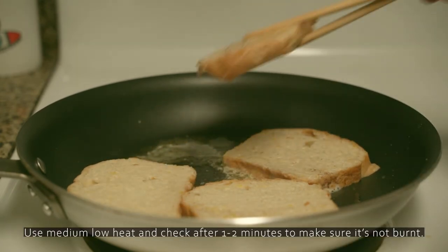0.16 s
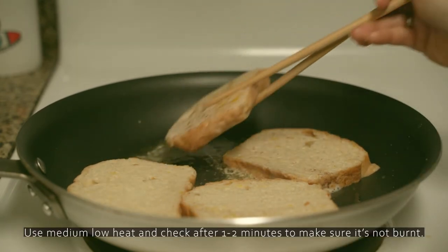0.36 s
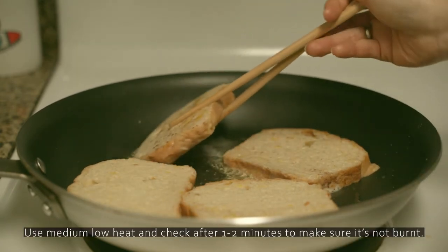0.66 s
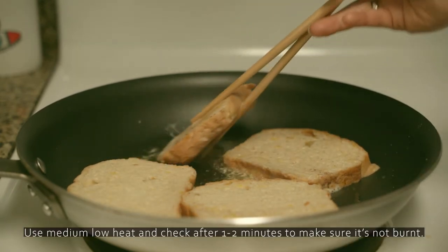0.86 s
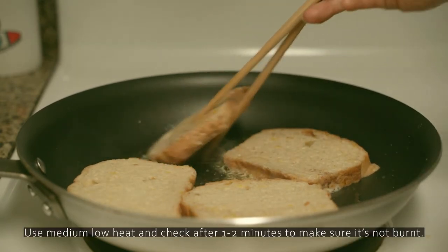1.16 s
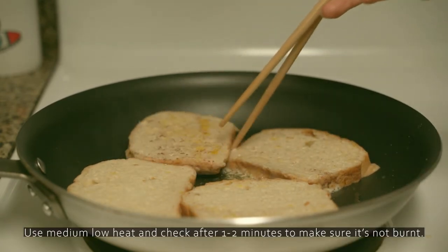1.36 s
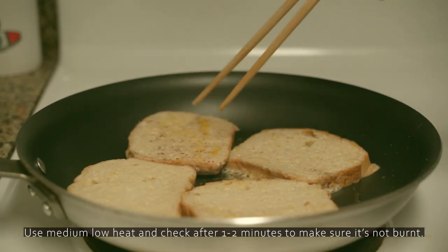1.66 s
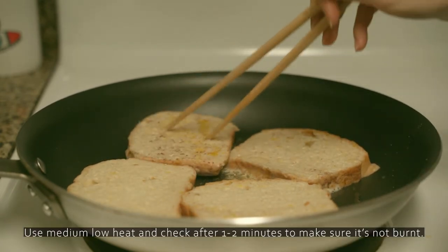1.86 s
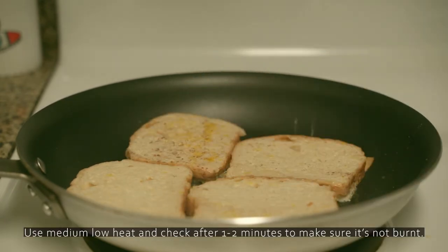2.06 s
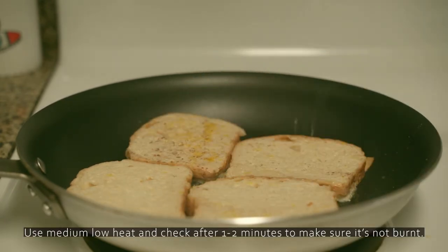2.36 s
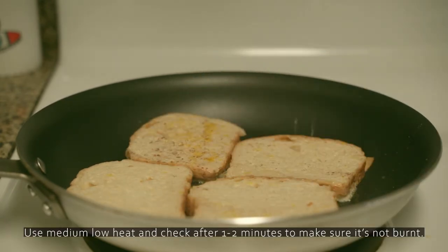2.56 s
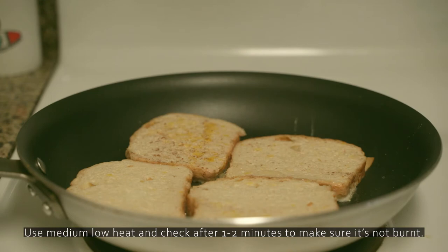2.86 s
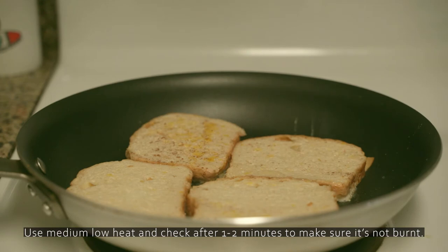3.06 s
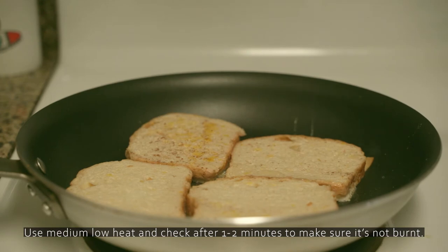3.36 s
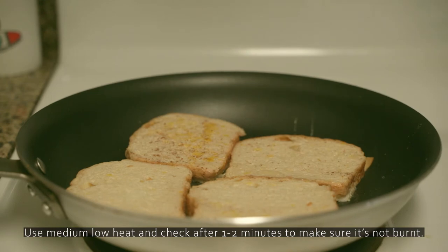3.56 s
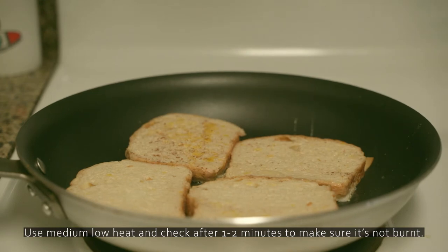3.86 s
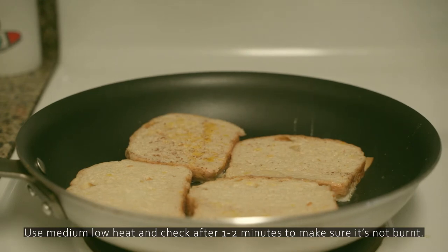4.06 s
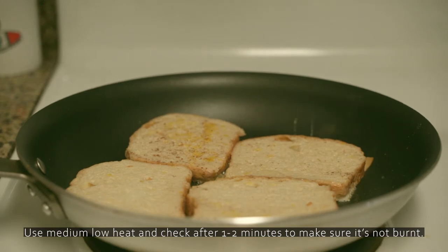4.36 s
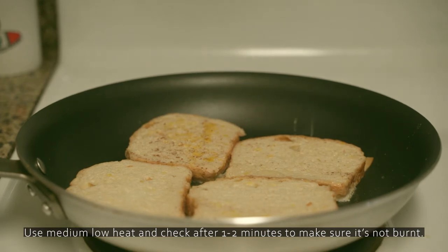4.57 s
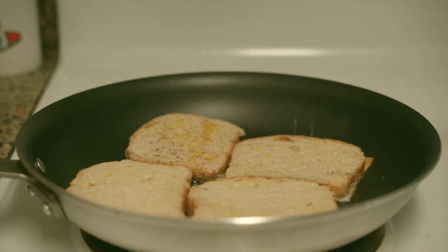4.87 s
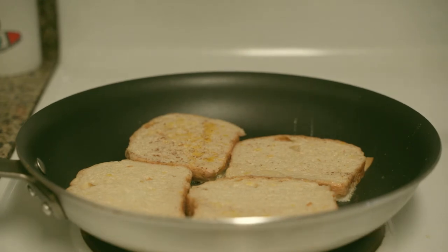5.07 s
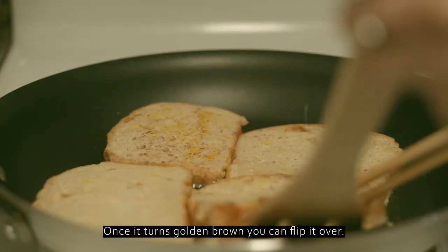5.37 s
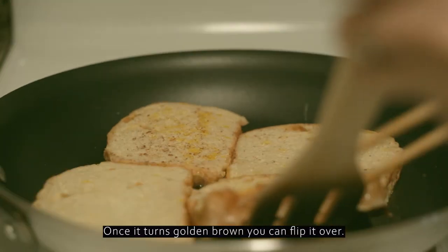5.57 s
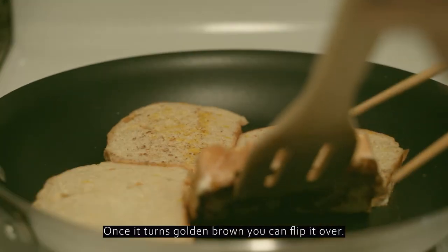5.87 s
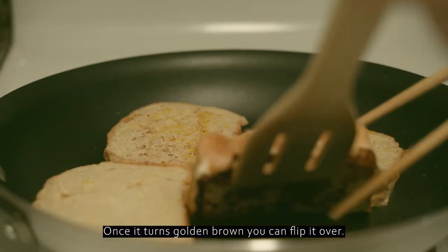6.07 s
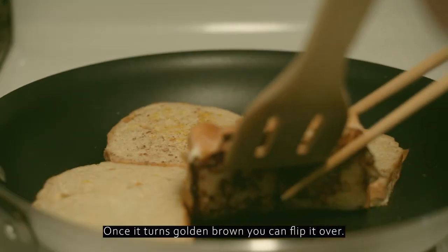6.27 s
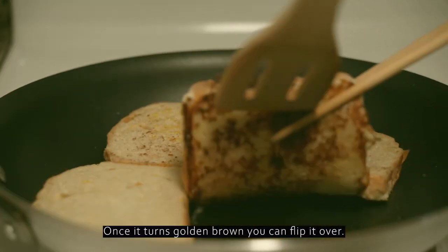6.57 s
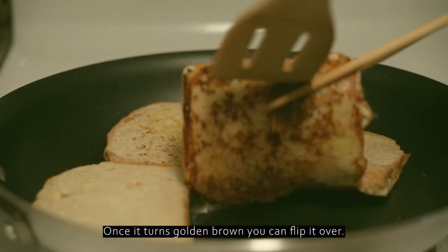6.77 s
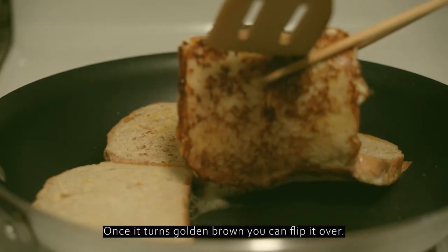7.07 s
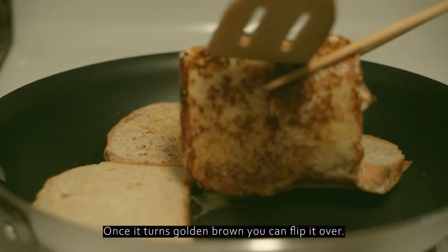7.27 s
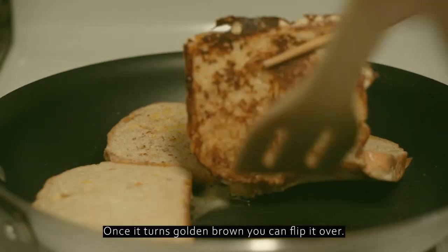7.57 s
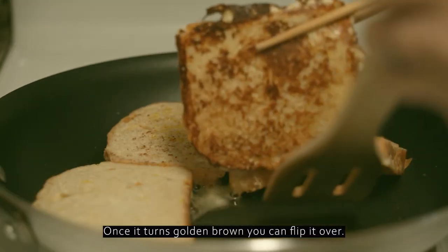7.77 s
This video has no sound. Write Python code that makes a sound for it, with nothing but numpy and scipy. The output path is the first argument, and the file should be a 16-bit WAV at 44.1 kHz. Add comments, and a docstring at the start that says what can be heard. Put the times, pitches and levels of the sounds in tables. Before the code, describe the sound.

A frying pan crackles nearby, loudest at first, with hard snaps and a few squeaky metallic rubs as a slice is moved. The fizz thins slightly, still popping, and something knocks once. Then a sudden cut to much quieter frying: thin fizz, occasional ticks and grainy wooden scraping. A fan hums and rumbles steadily behind in a small, hard-surfaced kitchen.

```python
"""Kitchen: egg-soaked bread fries in butter in a steel pan, with a fan rumbling and humming behind.
Fizz: random bubble bursts, each ringing a few cycles; pops and snaps: clicks with close, hard echoes.
Chopsticks drag a slice so that the pan's modes ring; a few damped modes make one knock.
The fizz is louder before 5.15 s, much quieter after, where a wooden turner scrapes softly (band noise).
Fan: noise bands plus narrow tones; a deep motor throb and faint swelling tones are wavering sines."""
import sys
import numpy as np
from scipy import signal
from scipy.io import wavfile

SR = 44100
rng = np.random.default_rng(int(sys.argv[2]) if len(sys.argv) > 2 else 0)


def generate_wav(sig):
    """Save sig (samples, or channels by samples) to the path in sys.argv[1] as 16-bit PCM at SR."""
    pcm = np.round(np.clip(np.atleast_2d(sig).T, -1, 1) * 32767).astype(np.int16)
    wavfile.write(sys.argv[1], SR, pcm)


N = 349272


def from_db(db):
    """Decibels to amplitude gain."""
    return 10 ** (np.asarray(db) / 20)


def rms_one(x):
    """Scaled to rms 1."""
    return x / np.sqrt(np.mean(x ** 2) + 1e-20)


def in_time(rows):
    """Each column after t/s as a curve, one value a sample."""
    t_s, *columns = np.transpose(rows)
    return [np.interp(np.arange(N) / SR, t_s, column) for column in columns]


def at_hz(points, hz):
    """A spectrum read on a log-frequency axis."""
    table_hz, values = np.array(points)[:, :2].T
    return np.interp(np.log(hz), np.log(table_hz), values)


def drift(rate_hz):
    """Slow random curve of rms 1: noise through two one-pole low-passes at rate_hz."""
    step = 40  # samples between computed points
    pole = np.exp(-2 * np.pi * rate_hz * step / SR)
    noise = rng.standard_normal(N // step + 2002)
    slow = signal.lfilter([1], [1, -2 * pole, pole ** 2], noise)[2000:]  # settled part
    return np.interp(np.arange(N) / step, np.arange(len(slow)), rms_one(slow))


def band(x, low_hz, high_hz):
    """Butterworth band-pass; the upper edge stays below Nyquist."""
    edges_hz = [low_hz, min(high_hz, SR / 2.1)]
    return signal.sosfilt(signal.butter(2, edges_hz, "band", fs=SR, output="sos"), x)


def ring(x, hz, t60_s):
    """Two-pole resonance: a unit click starts a decaying sine of height 1."""
    radius = from_db(-60 / (t60_s * SR))
    angle = 2 * np.pi * hz / SR
    return signal.lfilter([0, np.sin(angle)], [1, -2 * radius * np.cos(angle), radius ** 2], x + 1e-18)


def narrow_noise(hz, width_hz):
    """Noise through one resonance; rms 1."""
    t60_s = np.log(1000) / (np.pi * width_hz)
    return rms_one(ring(rng.standard_normal(N), hz, t60_s))


def wavering(hz, waver_hz, rate_hz):
    """Sine with drifting pitch and strength; rms 1."""
    turns = np.cumsum(hz + waver_hz * drift(rate_hz)) / SR + rng.random()
    return rms_one(np.sin(2 * np.pi * turns) * from_db(1.8 * drift(rate_hz)))


def swell(middle_s, length_s):
    """One half-cosine rise and fall of height 1."""
    return np.cos(np.pi * np.clip((np.arange(N) / SR - middle_s) / length_s, -.5, .5))


def clicks(times_s, gains):
    """Unit-sample train."""
    out = np.zeros(N)
    np.add.at(out, np.minimum((np.asarray(times_s) * SR).astype(int), N - 1), gains)
    return out


# left-right correlation of diffuse sound: f/Hz, correlation
LIKENESS = [(60, 1), (150, 0.88), (380, 0.66), (950, 0.62), (2380, 0.83), (5980, 0.3), (15000, 0.18)]


def stereo(mid, side, hz):
    """Two noises mixed to the left-right correlation of diffuse sound at hz."""
    alike = np.clip(at_hz(LIKENESS, hz), 0, 1)
    return np.sqrt(1 + alike) * mid + np.sqrt(1 - alike) * side * [[1], [-1]]


def diffuse(hz):
    """White stereo noise of rms 1 with the diffuse correlation of hz."""
    mid, side = rng.standard_normal((2, N))
    return stereo(mid, side, hz) / np.sqrt(2)


def tail(power, t60_s):
    """Amplitude envelope of sound that lingers after bursts of power."""
    fall = from_db(-120 / (t60_s * SR))
    return np.sqrt(signal.lfilter([0, 1 - fall], [1, -fall], power + 1e-18))


# pan wall, hob, splashback: delay/s, left level/dB, right level/dB
ECHOES = [(.0026, -9, -38), (.0059, -11.5, -19), (.0118, -4, -11)]


def echoes(x):
    """Direct sound plus hard reflections, a few samples later left than right."""
    out = np.array([x, x])
    for k, (delay_s, left_db, right_db) in enumerate(ECHOES):
        lag, skew = round(delay_s * SR), k + 1
        out[0, lag + skew:] += from_db(left_db) * x[:-lag - skew]
        out[1, lag - skew:] += from_db(right_db) * x[:-lag + skew]
    return out


# fan noise, relative spectrum: f/Hz, density/dB per Hz
FAN_SPECTRUM = [(11, -31), (18, 12), (43, -2.5), (97, 1.5), (167, -2.5), (492, -8.5), (794, -3),
                (881, -0.5), (1480, -7), (1900, -7), (2110, -18), (2600, -30), (3380, -48), (5720, -120)]
# steady fan tones: f/Hz, width/Hz, level/dB
FAN_TONES = [(173.5, 16.4, -63.5), (350, 14, -72)]
FAN_NOISE_DB = -51


def fan(patchy_db):
    """Rushing air as half-octave noise bands with drifting levels, plus the motor's tones."""
    air, edges_hz = 0, 18 * 2 ** np.arange(0, 8, .5)
    white = rng.standard_normal((2, 2, N))  # neighbouring bands take different noise
    for k, (low_hz, high_hz) in enumerate(zip(edges_hz, edges_hz[1:])):
        mid, side = band(white[k % 2], low_hz, high_hz)
        hz = np.sqrt(low_hz * high_hz)
        gain = from_db(at_hz(FAN_SPECTRUM, hz) + patchy_db * drift(9.3))
        air = air + gain * stereo(mid, side, hz)
    tones = sum(from_db(db) * narrow_noise(hz, width_hz) for hz, width_hz, db in FAN_TONES)
    return from_db(FAN_NOISE_DB) * rms_one(air) + tones


# motor throb: t/s, level/dB
THROB = [(0.0, -56), (1.15, -60.5), (2.87, -64), (4.98, -60), (5.82, -71), (6.53, -58), (6.86, -75),
         (7.41, -58), (7.92, -67)]


def throb(hz, waver_hz):
    """Deep motor throb: one wavering sine under a level curve."""
    level_db, = in_time(THROB)
    return from_db(level_db) * wavering(hz, waver_hz, 3.5)


# faint tones: middle t/s, length/s, level/dB, f/Hz
FAINT_TONES = [(2.5, 1.5, -65.5, 370), (6.05, 0.37, -68, 300), (6.18, .3, -61.5, 236),
               (7.206, 1.2, -62, 230), (7.75, 0.99, -58, 304)]


def faint_tones(waver_hz):
    """Wavering low sines that swell and fade."""
    return sum(from_db(db) * swell(middle_s, length_s) * wavering(hz, waver_hz, 3.0)
               for middle_s, length_s, db, hz in FAINT_TONES)


# wooden turner sliding under the bread: t/s, level/dB
TURNER = [(5.42, -74), (5.6, -50.5), (5.9, -54.5), (6.1, -55.5), (6.37, -53), (6.9, -57), (7.4, -59)]


def turner():
    """Soft, grainy scrape of wood: band noise with a fast-drifting level."""
    level_db, = in_time([(0, -99)] + TURNER + [(8, -99)])
    rub = diffuse(930) * from_db(3.9 * drift(25.0))
    return from_db(level_db) * rms_one(band(rub, 980, 2000))


# dull blow: t/s, level/dB
KNOCK = [(3.819, -23.5)]
# modes it excites: f/Hz, level/dB, t60/s
KNOCK_MODES = [(259, -19, 0.027), (613, -0.5, 0.013), (930, 1.5, 0.0037), (1430, -1, 0.0042),
               (2240, -1, 0.0093)]


def knocks(room_db, room_t60_s):
    """A blow, its echoes and room tail drive a few well-damped modes."""
    times_s, levels_db = np.transpose(KNOCK)
    blows = clicks(times_s, from_db(levels_db))
    room = from_db(room_db) * tail(blows ** 2, room_t60_s) * diffuse(500)
    heard = echoes(blows) + room
    modes = sum(from_db(db) * ring(heard, hz, t60_s) for hz, db, t60_s in KNOCK_MODES)
    return band(modes, 180, 3000)


# slips of the dragged slice: middle t/s, length/s, level/dB
DRAG_SLIPS = [(.572, 0.062, -37), (0.641, 0.07, -33), (0.688, .05, -38), (0.73, 0.057, -32.5),
              (0.863, 0.053, -37.5), (1.23, 0.18, -43), (1.308, 0.11, -39), (1.396, 0.11, -39.5),
              (1.475, .05, -37.5), (1.516, 0.052, -35), (1.587, 0.17, -39.5)]
# low pan modes under the slice: f/Hz, waver/Hz, level/dB
PAN_LOW_MODES = [(594, 22, -16), (678, 22, -17), (1010, 25, -14), (1654, 9, 0)]


def drag():
    """Each slip of the sliding slice sets the pan's low modes singing."""
    slips = sum(from_db(db) * swell(middle_s, length_s) for middle_s, length_s, db in DRAG_SLIPS)
    return slips * sum(from_db(db) * wavering(hz, waver_hz, 32.3) for hz, waver_hz, db in PAN_LOW_MODES)


# butter gurgling under the slices: t/s, level/dB
GURGLE = [(0, -55.5), (.55, -48), (1.9, -48), (2.1, -57), (3.0, -59.5), (3.4, -54), (7.92, -75)]


def gurgle(low_hz, high_hz):
    """Fat bubbling under the bread: low band noise with a lumpy level."""
    level_db, = in_time(GURGLE)
    lumps = diffuse(700) * from_db(2.0 * drift(33.0))
    return from_db(level_db) * rms_one(band(lumps, low_hz, high_hz))


# high pan modes rung by the bursts: f/Hz, width/Hz, level/dB
PAN_HIGH_MODES = [(2698, 29, 0), (2846, 20, -2), (2880, 17, -14), (3235, 15, -38.5), (3634, 17, 3.5),
                  (4015, 49, 2), (4580, 14, 5), (5520, 13, 2), (6320, 51, -5), (6600, 32, -11),
                  (6700, 18, -10), (7540, 33, -2.5)]


def ringing_steel(bursts):
    """The bursts drive narrow resonances of the steel."""
    return sum(from_db(db) * signal.lfilter(*signal.iirpeak(hz, hz / width_hz, SR), bursts)
               for hz, width_hz, db in PAN_HIGH_MODES)


# snap colours: low f/Hz, high f/Hz
SNAP_BANDS = [(1800, 6200), (3500, 8600), (6000, 15000), (10000, 31000)]
SNAPS_PER_S, SNAP_DB = 110, 12.0  # smallest snap re FRYING level


def snaps(spread_db, wide):
    """Droplets snap dry: random clicks with echoes, each at its own place; band redrawn every 25 ms."""
    born = rng.random(N) < SNAPS_PER_S / SR
    size = from_db(spread_db * np.minimum(rng.exponential(1, N), 3.5)) * rng.choice([-1, 1], N)
    place = wide * rng.uniform(-1, 1, N)
    drawn = rng.integers(0, len(SNAP_BANDS), N)
    train = born * size * from_db(in_time(FRYING)[0] + SNAP_DB)
    placed = echoes(train) + train * place * [[1], [-1]]
    hold = SR // 40  # samples sharing one band
    colour = np.repeat(drawn[::hold], hold)[:N]
    return sum(band(placed * (colour == k) + 1e-18, *edges_hz) for k, edges_hz in enumerate(SNAP_BANDS))


SMALL_POPS = 40
SMALL_POP_DB, SMALL_POP_SPREAD_DB = 14, 9  # re FRYING level; spread is +/-
SMALL_DULL_DB, SMALL_BRIGHT_DB, SMALL_SPATTER_DB = -17, -9.5, 4.5
SMALL_LOW_HZ, SMALL_HIGH_HZ = 2800, 9800


def small_pops():
    """Rows like POPS at random times and pitches, following the fizz level."""
    when, size, pitch = rng.random((SMALL_POPS, 3)).T
    at = (when * (N - 1)).astype(int)
    level_db = in_time(FRYING)[0][at] + SMALL_POP_DB + SMALL_POP_SPREAD_DB * (2 * size - 1)
    pitch_hz = SMALL_LOW_HZ * (SMALL_HIGH_HZ / SMALL_LOW_HZ) ** pitch
    return [(i / SR, db, SMALL_DULL_DB, SMALL_BRIGHT_DB, SMALL_SPATTER_DB, hz)
            for i, db, hz in zip(at, level_db, pitch_hz)]


# louder pops: t/s, level/dB before crack_db, dull part/dB re level, bright part/dB re level,
# spatter/dB re crack, f/Hz
POPS = [(0.081, -8, -18, -17, 10.5, 6300), (0.2728, -1, -14.5, -11, 1.5, 6940),
        (0.3853, 4.5, -15.5, -18, 3.5, 7200), (0.4626, -5.5, -16, -1.5, -3, 7800),
        (0.5646, -7.5, -18, -18, 12.5, 7360), (0.6716, -3.5, -28, -32, 8, 6500),
        (0.777, -10, -14, -5.5, 9.5, 8800), (0.8668, 2.5, -20, -20, 4, 8400),
        (1.0013, -11.5, -13, -8, 12, 6830), (1.149, -5.5, -16.5, -11.5, 11.5, 7040),
        (1.3097, -11.5, -14, -6, 12, 9700), (1.345, -8, -17, -16, 12, 5800),
        (1.44, -17.5, -25, 11.5, -6, 8980), (1.708, -12.5, -9.5, -14, 9, 5210),
        (1.7958, -6.5, -14.5, -10, 10.5, 7820), (1.9883, -11, -30, -27, 12, 8200),
        (2.141, -20, -16.5, -30, 19.5, 4640), (2.2453, -7.5, -9, 0, -16, 3680),
        (2.375, -17, -10, -22, 10, 4000), (2.4817, -8, -11, -3, 0, 3060), (2.551, -13, -17, -6, 7.5, 9740),
        (2.755, -10, -26, -10.5, 7.5, 3630), (2.839, -5, -19, -12, 4.5, 8500),
        (2.9362, -10.5, -24, -6, 0, 9480), (3.033, -1, -18, -6, 2, 8340), (3.174, -10, -2.5, -6.5, 5, 3130),
        (3.281, -18, -13, -17, 12, 2840), (3.4216, -20.5, -31, -18, 19.5, 6640),
        (3.4599, -6, -24, -7, 2.5, 2600), (3.5553, -26.5, -3.5, -24, 19, 3670),
        (3.631, -5.5, -33, -16, 6.5, 9700), (3.898, 3.5, -13, -27, 0, 5960),
        (4.0213, -9.5, -34, -7.5, 10, 8360), (4.161, -11, -5, -5, 4.5, 4000),
        (4.283, -13, -23, -14, 8.5, 4080), (4.4389, -4, -15, -11, -1, 8100), (4.582, -5, -34, -26, 5, 6000),
        (4.703, -13.5, -4.5, -2, -3, 6570), (4.8257, -6.5, -10, -8, 2.5, 7540),
        (4.9554, -5, -16.5, -31, 7, 8000), (5.0582, -14, -2, 4.5, 3, 2800),
        (5.222, -17, -32.5, -41, 11, 6760), (5.4126, -25, -1, -13, 0.5, 3380),
        (5.628, -32, -12, 1, 4, 3380), (5.7655, -32, -17, 4, 7, 9900), (5.9126, -19, -5.5, -1.5, 5, 3600),
        (5.943, -21, -17, -4, -1, 8930), (6.088, -14.5, -26, -24, -1, 7190),
        (6.9631, -24, -16, -3, 8, 7660), (7.1085, -25.5, -26, -2.5, 6, 5050),
        (7.297, -15.5, -36, -2.5, 0.5, 4100), (7.5798, -11.5, -8.5, -6.5, -0.5, 4250),
        (7.8688, -17.5, -22, -6.5, 1.5, 4840)]


def pops(crack_db, spatter_t60_s, spread):
    """Sharp crack with echoes, then dying droplets; strongest near the burst bubble's pitch."""
    out, span = np.zeros((2, N + SR)), SR // 4
    first = clicks([0], 0.66)
    crack = echoes(first)[:, :span]
    dying = tail(first, spatter_t60_s)[:span]
    droplets = diffuse(3300) * from_db(2.4 * drift(76.0))
    for t_s, level_db, dull_db, bright_db, spatter_db, hz in POPS + small_pops():
        at = round(t_s * SR)
        spray = np.take(droplets, at + np.arange(span), axis=1, mode="wrap")
        burst = from_db(level_db + crack_db) * (crack + from_db(spatter_db) * dying * spray)
        body = from_db(-8.5) * np.sqrt(6000 / hz) * band(burst, hz / spread, hz * spread)
        dull = from_db(dull_db) * band(burst, 1220, 4060)
        bright = from_db(bright_db) * band(burst, 9860, 27000)
        out[:, at:at + span] += body + dull + bright
    return out[:, :N]


# fizz, louder before 5.15 s, quieter after: t/s, level/dB before trim, large bubbles/dB re level,
# small bubbles/dB re level
FRYING = [(0.0, -27, -7.5, 0), (0.5, -28, -2.5, 2.5), (1.2, -29, -4, 1.5), (1.8, -27.5, -3.5, 1),
          (1.95, -31, -1, 0), (2.65, -35, 0.5, 5), (2.85, -30.5, -2, 2.5), (3.2, -33.5, -0.5, 3.5),
          (4.1, -33.5, 1, 1.5), (4.9, -34, -3, 1.5), (5.144, -35.5, 3.5, 4.5), (5.151, -48, 4, 4),
          (5.5, -49.5, 2, 5.5), (5.8, -48, 2, 6.5), (6.45, -48, 2.5, 6.5), (7.0, -48, -1.5, 4.5),
          (7.92, -48.5, 1, 5.5)]
# fizz spectrum: f/Hz, density/dB per Hz
FIZZ_COLOUR = [(290, -39), (500, -37), (1000, -38), (1280, -30), (1620, -1.5), (1820, -6), (2730, -1),
               (3250, -2), (6510, 1), (10500, -2), (15100, -12), (16000, 18)]
FIZZ_TRIM_DB, FIZZ_ROOM_T60_S = -10.5, 0.15


def fizz(per_s, cycles, spread_db, clump_db, wide, room_db):
    """Bubbles of every size burst at random, in clumps, all over the pan; each rings a few cycles."""
    level_db, large_db, small_db = in_time(FRYING)
    out, together = np.zeros((2, N)), drift(10.0)
    busy = np.clip((level_db + 58.0) / 25.0, 0, 1)  # loud fizz comes in clumps, quiet fizz more evenly
    pitches_hz = np.geomspace(520, 15500, 22)
    for hz in pitches_hz:
        clump = from_db(clump_db * busy * (.5 * together + drift(14.0)))
        rate_per_s = per_s / len(pitches_hz) * np.sqrt(hz / 4000) * clump
        at = np.flatnonzero(rng.random(N) < rate_per_s / SR)
        size_draw, sign_draw, place_draw = rng.random((len(at), 3)).T
        size = from_db(spread_db * np.minimum(-np.log(size_draw), 5)) * np.sign(sign_draw - .5)
        place = wide * (2 * place_draw - 1)
        bursts = np.zeros((2, N))
        bursts[:, at] = size * np.array([1 + place, 1 - place])
        # spots differ, so the kitchen's answer is a fresh diffuse tail
        answer = from_db(room_db) * tail(np.mean(bursts ** 2, axis=0), FIZZ_ROOM_T60_S) * diffuse(hz)
        rings = rms_one(ring(bursts + answer, hz, cycles / hz))
        octave = np.log2(hz / 6000)  # large bubbles below, small above
        share_db = large_db * np.clip(-octave, 0, 1) + small_db * np.clip(octave, 0, 1)
        out += from_db(at_hz(FIZZ_COLOUR, hz) + share_db) * np.sqrt(hz / 6000) * rings
    return band(from_db(level_db + FIZZ_TRIM_DB) * out, 717, SR / 2)


# pan leans left, then sits central: t/s, left gain/dB (right takes the opposite)
PAN_LEAN = [(0, 0.2), (5.14, 0.4), (5.15, 0), (8, 0)]
FAN_LEAN_DB = -0.23  # left gain, right opposite: a little to the right


def scene():
    """The pan in front, the fan behind."""
    behind = from_db([[FAN_LEAN_DB], [-FAN_LEAN_DB]]) * fan(patchy_db=-0.3)
    behind = behind + throb(hz=28.5, waver_hz=2.48) + faint_tones(waver_hz=1.57)
    bursts = fizz(per_s=7000, cycles=13.2, spread_db=4.0, clump_db=2.5, wide=1.0, room_db=4.0)
    bursts = bursts + pops(crack_db=15.5, spatter_t60_s=.13, spread=1.32)
    bursts = bursts + snaps(spread_db=3.0, wide=.4)
    pan = bursts + ringing_steel(bursts) + gurgle(370, 1500)
    pan = pan + echoes(drag()) + turner() + knocks(room_db=3.0, room_t60_s=0.34)
    lean_db, = in_time(PAN_LEAN)
    return pan * from_db([lean_db, -lean_db]) + behind


def record(dry):
    """Steep low-pass, 60 dB down from 16050 Hz."""
    return signal.sosfilt(signal.cheby2(20, 60, 16050, fs=SR, output="sos"), dry)


dry = scene()
out = record(dry)
generate_wav(out)
```